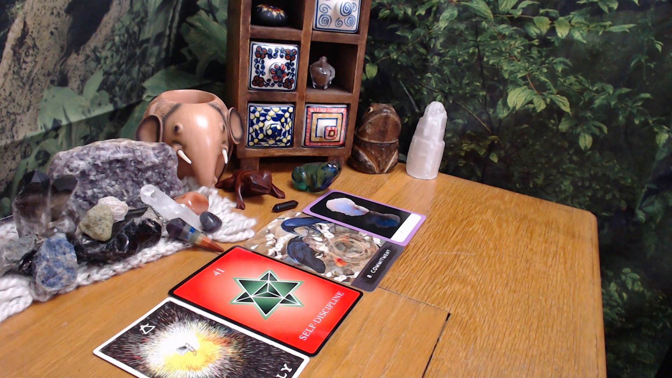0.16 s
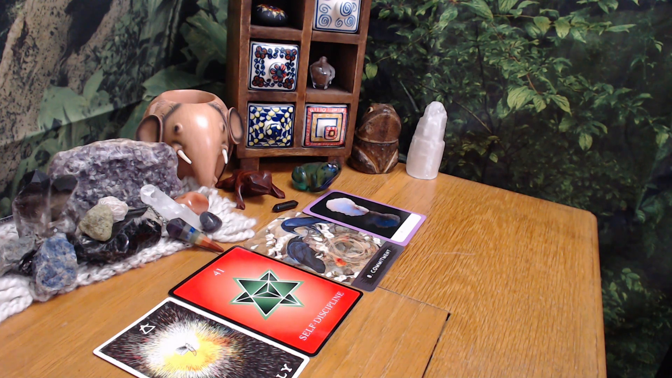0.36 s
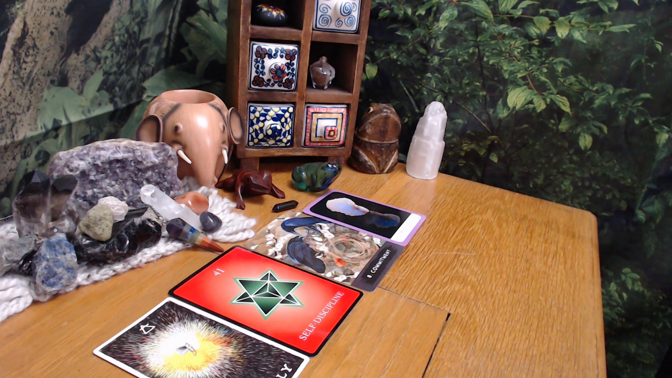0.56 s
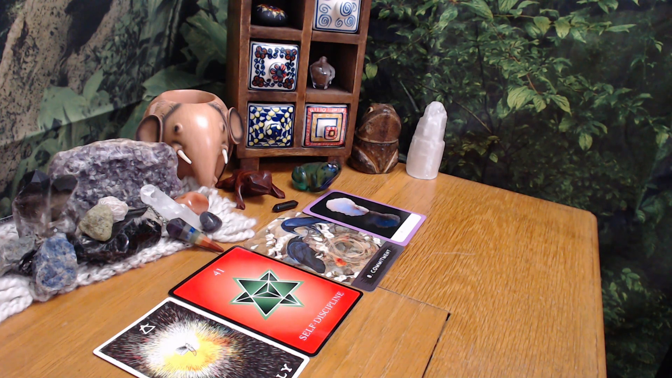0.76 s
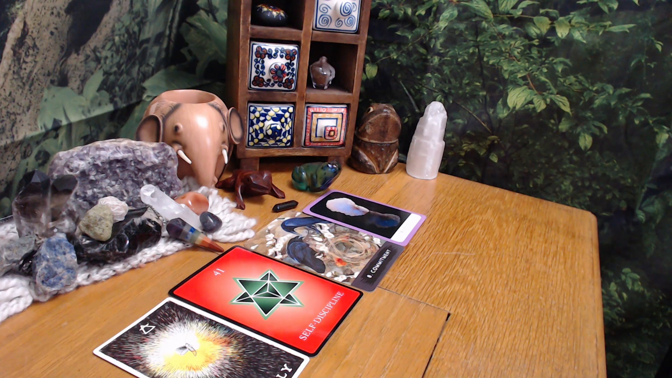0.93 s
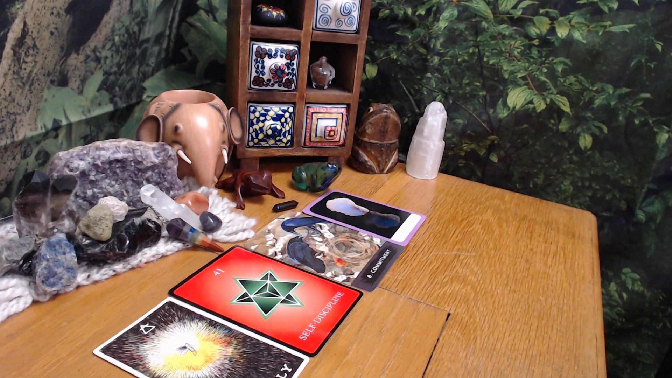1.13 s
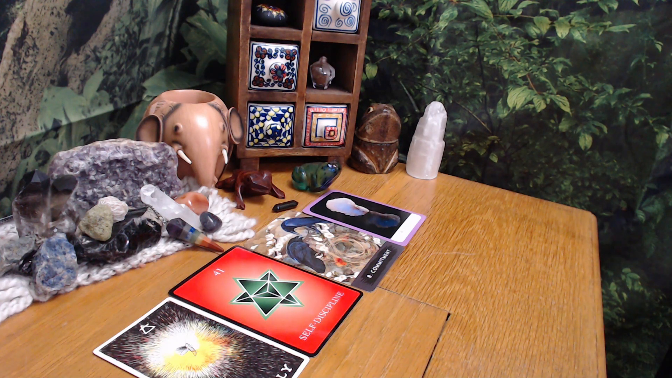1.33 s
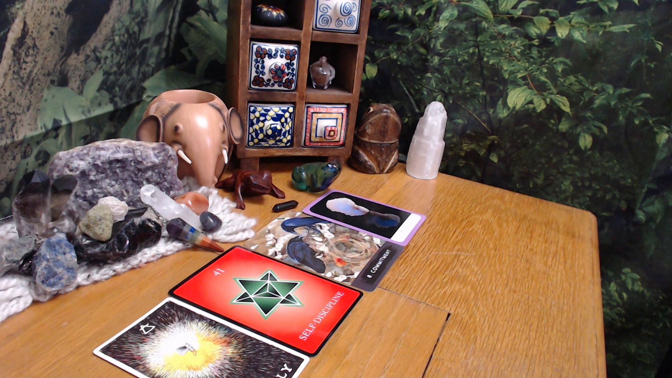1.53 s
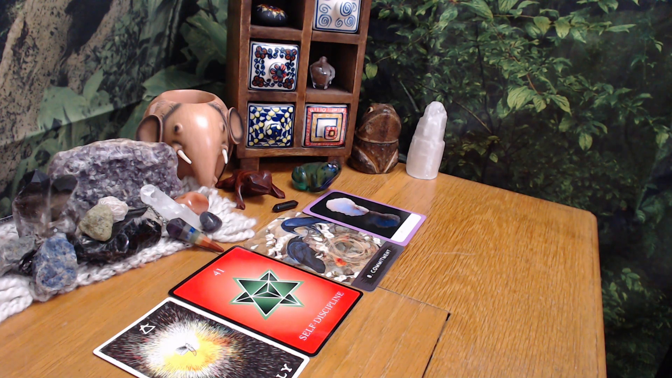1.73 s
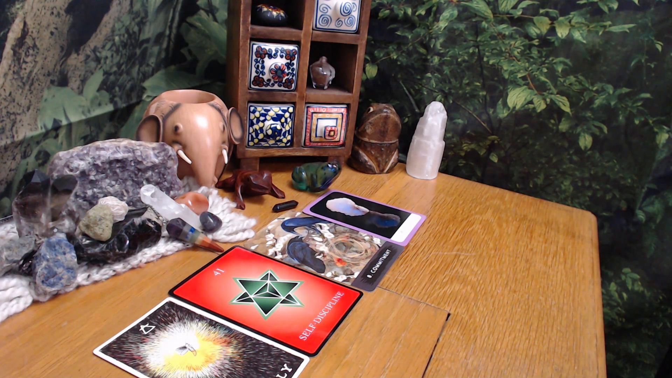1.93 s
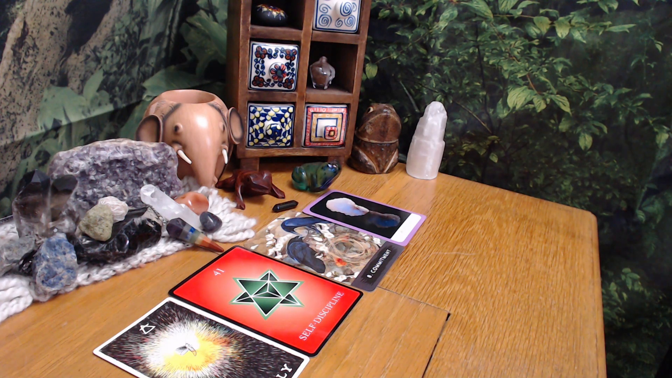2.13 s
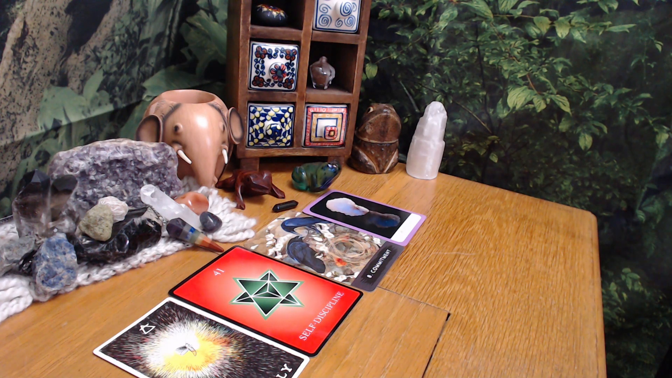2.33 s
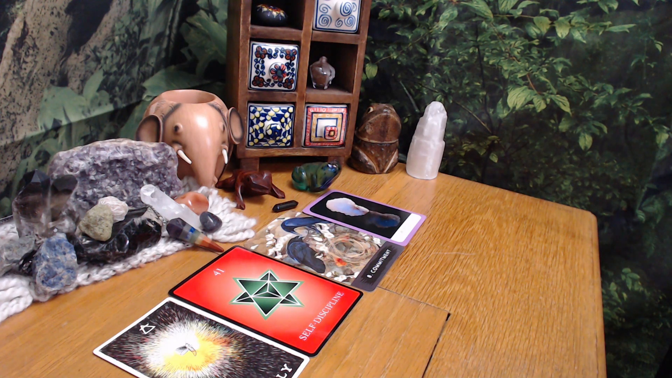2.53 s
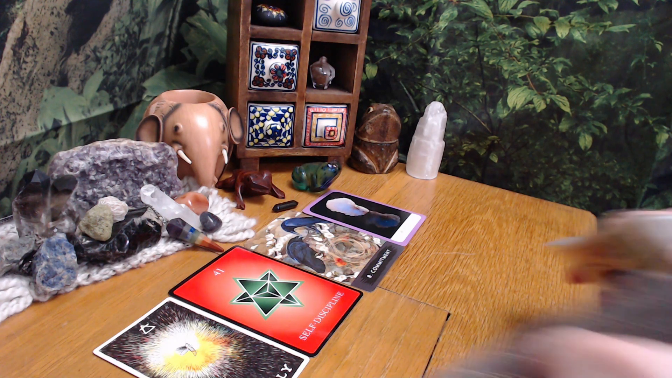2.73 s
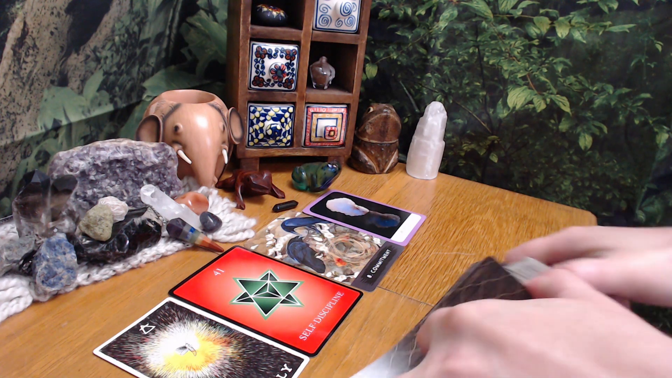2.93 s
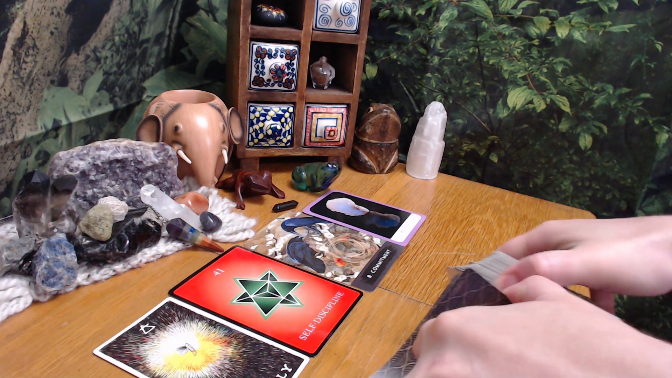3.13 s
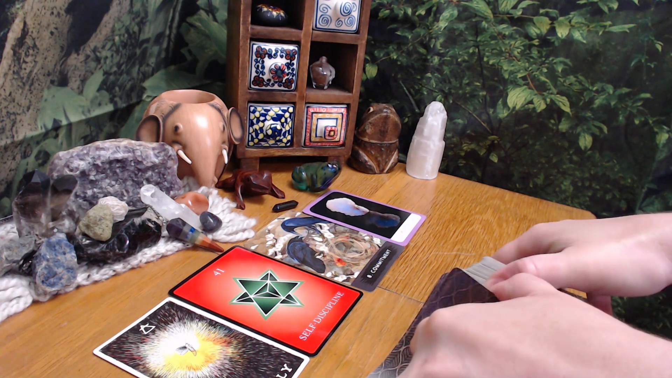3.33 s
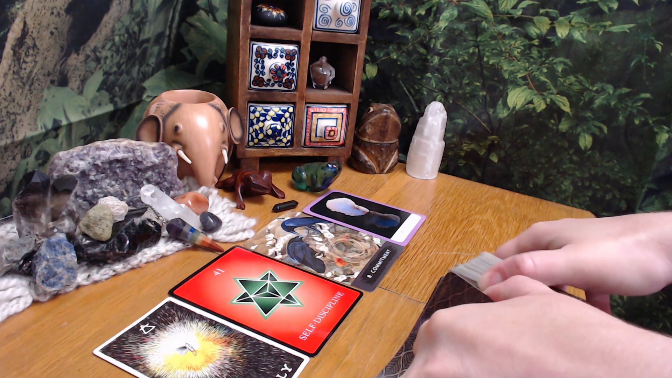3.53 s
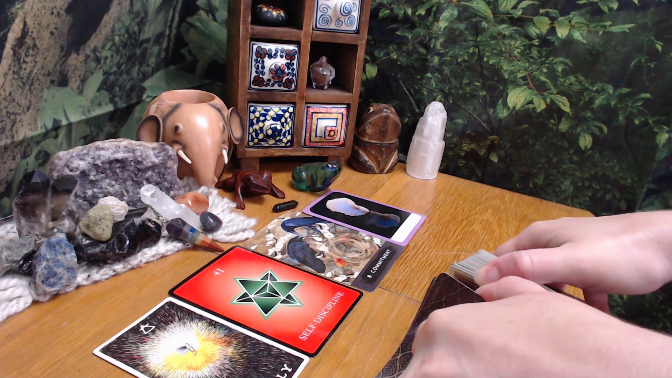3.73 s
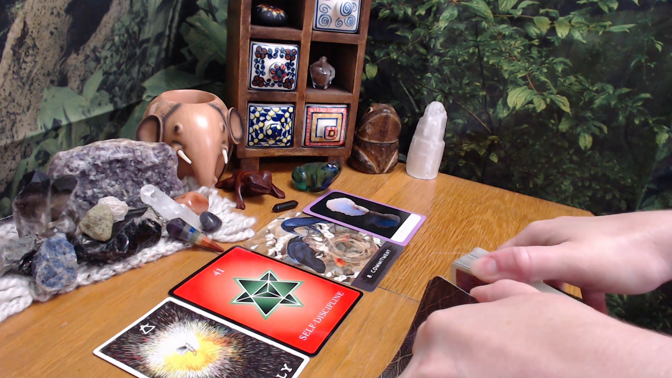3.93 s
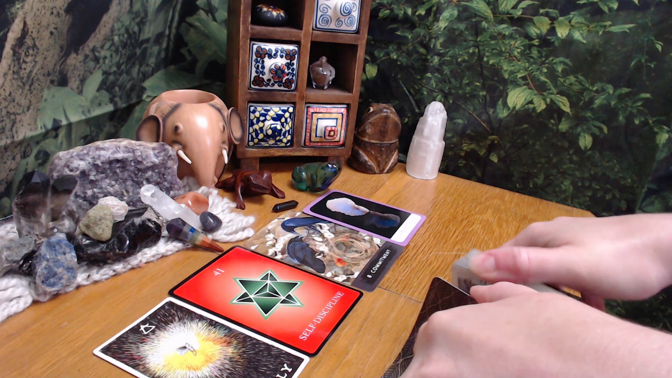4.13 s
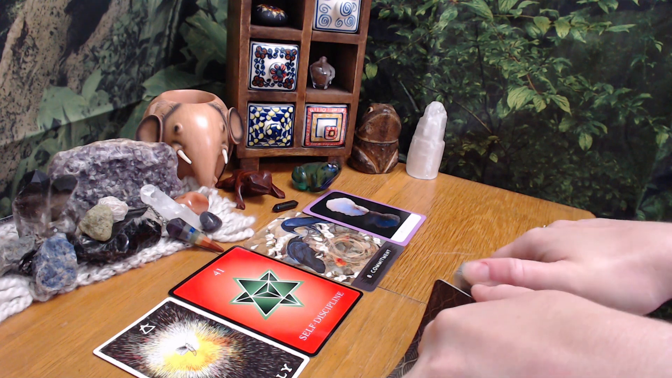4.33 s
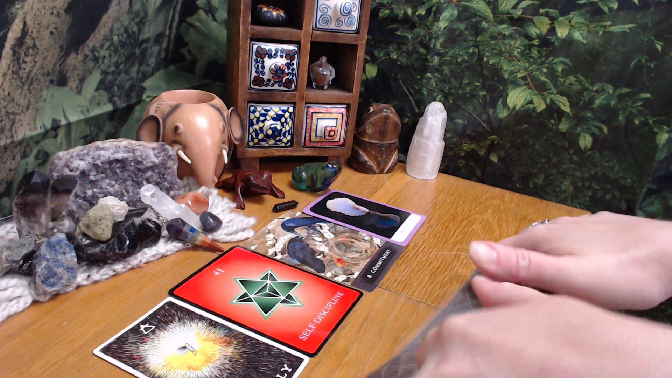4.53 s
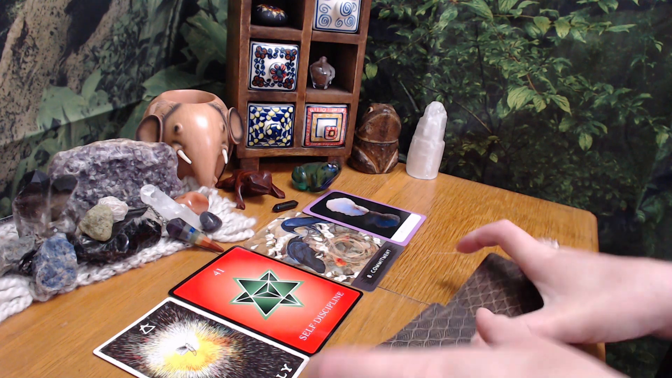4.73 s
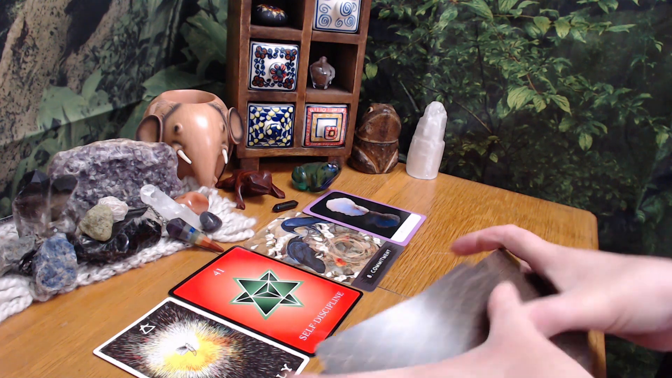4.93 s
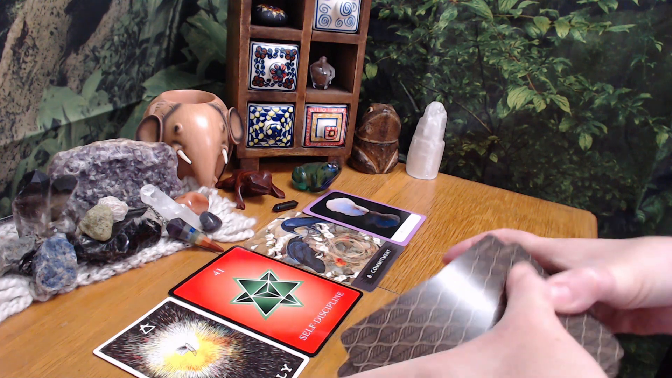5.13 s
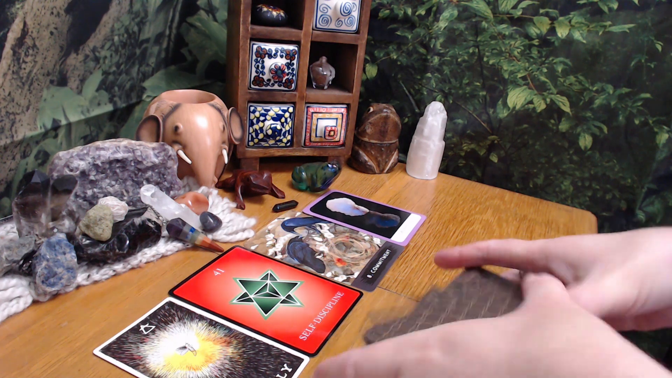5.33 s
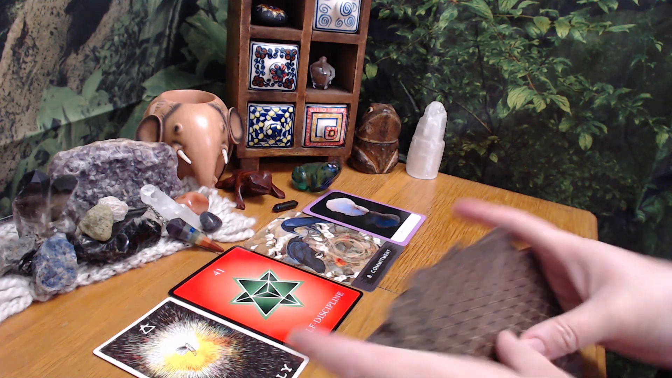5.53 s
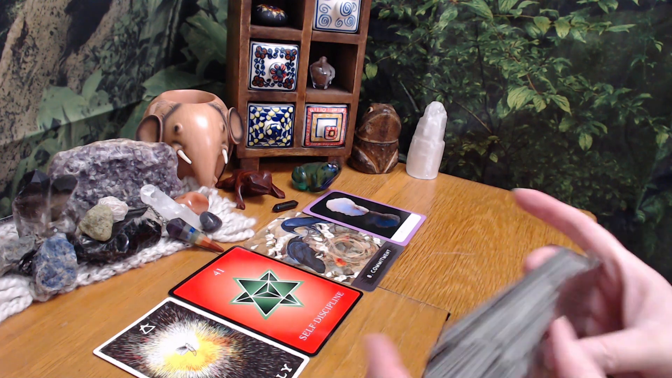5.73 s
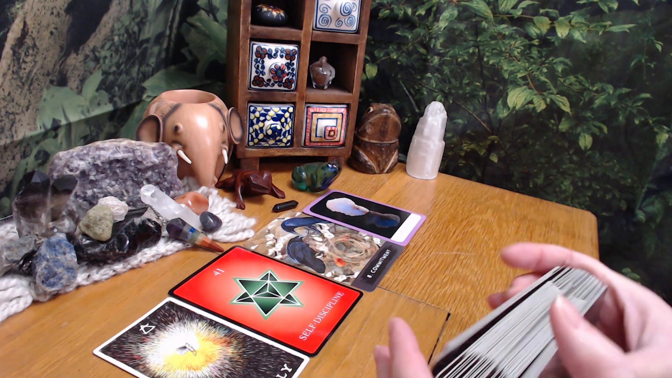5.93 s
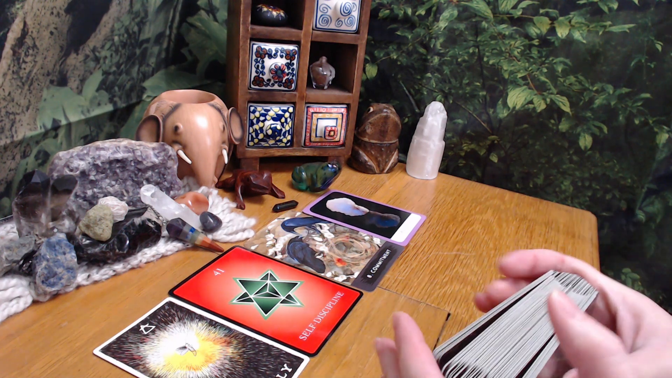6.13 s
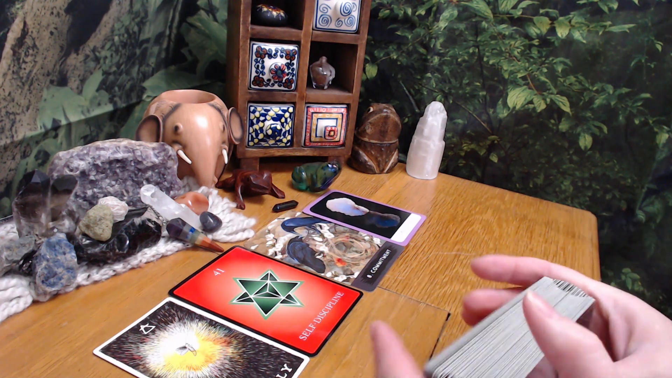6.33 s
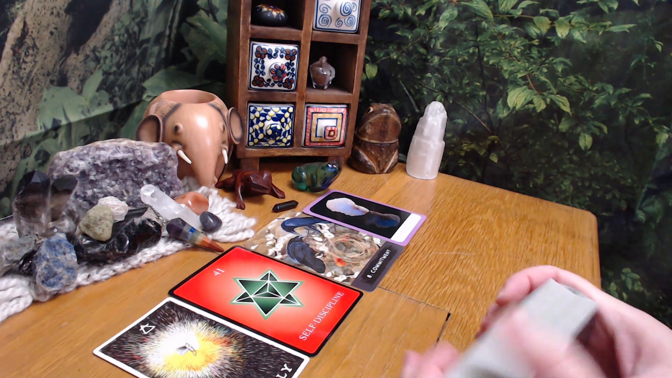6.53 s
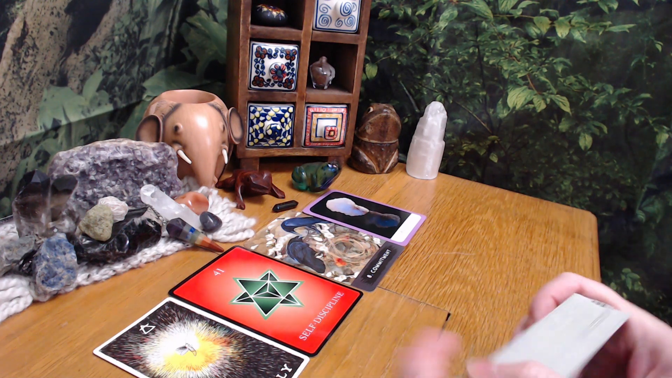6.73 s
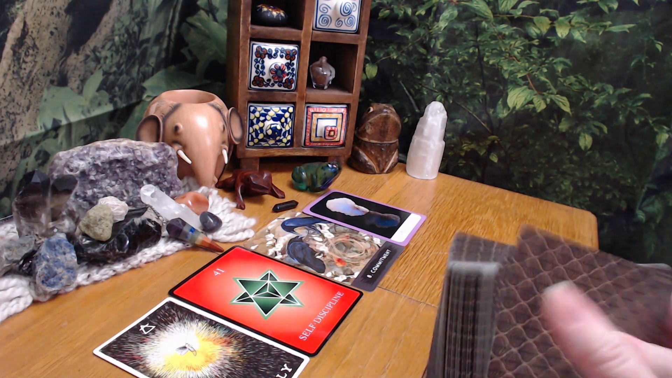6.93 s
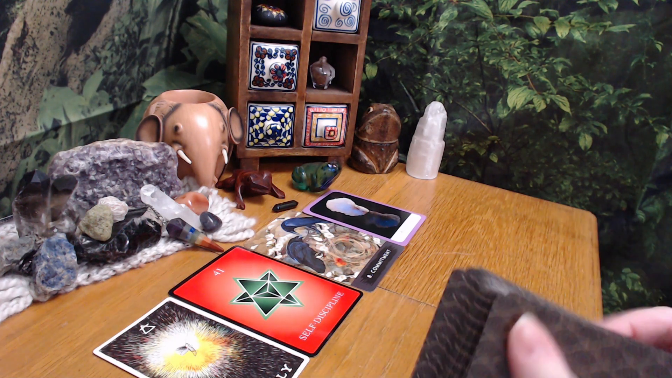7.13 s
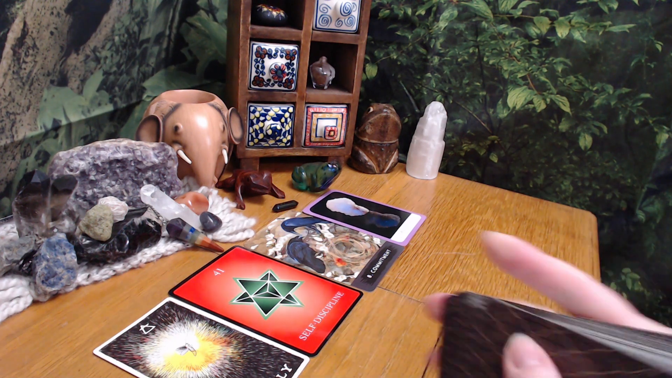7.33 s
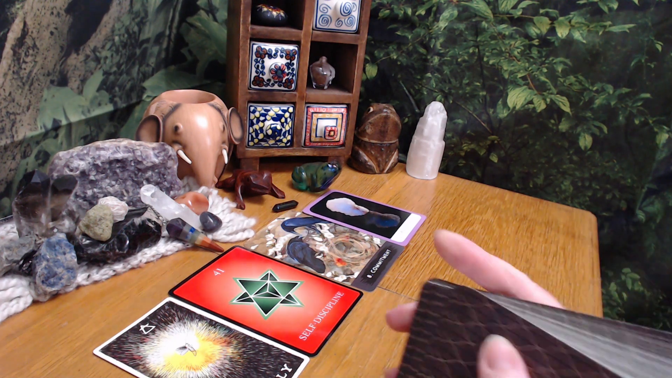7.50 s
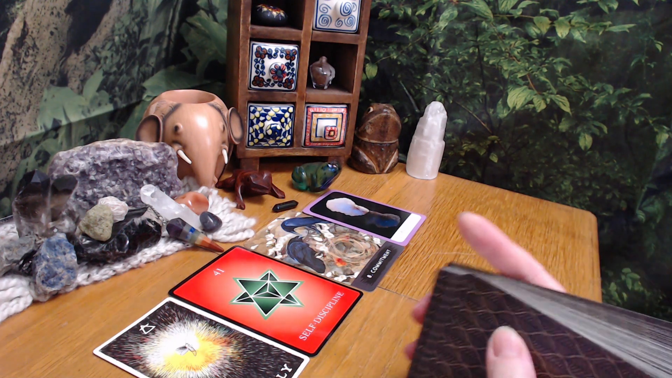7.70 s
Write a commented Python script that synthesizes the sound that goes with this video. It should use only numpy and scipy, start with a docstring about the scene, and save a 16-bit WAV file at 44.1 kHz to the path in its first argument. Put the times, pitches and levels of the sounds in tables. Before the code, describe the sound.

A deck of cards is riffled on a wooden table, then slid together and knocked square, close up.

```python
"""A deck of stiff cards is riffled on a wooden table, close to a small microphone.
Packets of cards slap down one after another, each with a crack, a short ring and a thump in the table.
Then the halves rub and hiss as they slide together, and the deck is knocked square.
A small, quiet room echoes and hums faintly, and the table top wobbles when someone leans on it."""
import sys
import numpy as np
from scipy import signal
from scipy.fft import rfft, irfft, next_fast_len
from scipy.io import wavfile
from scipy.ndimage import map_coordinates

SR = 44100
rng = np.random.default_rng(int(sys.argv[2]) if len(sys.argv) > 2 else 0)


def digitize_waveform(pressure):
    """Quantize a signal to 16-bit integers and store it at the path in sys.argv[1].

    Rows of a 2-D input are taken as channels; values are limited to [-1, 1].
    """
    field = np.atleast_2d(pressure).T
    bounded = np.clip(field, -1, 1)
    quanta = np.round(bounded * 32767).astype(np.int16)
    wavfile.write(sys.argv[1], SR, quanta)


N = 346626
HIT_TIME = np.arange(5400) / SR  # seconds since the start of one hit

# The room's background noise. Each row: frequency in Hz, level in dB.
AIR_COLOUR = [(12, -22), (20, 1), (48, -4.5), (223, -22), (874, -24.5), (1470, -30.5), (1800, -31.5),
              (2610, -42.5), (3790, -40.5), (4080, -38), (4400, -44.5), (7050, -42.5), (7600, -43.5),
              (9880, -76.5), (16700, -120)]
# Faint appliance hums. Each row: pitch in Hz, how far it wanders in Hz, level in dB.
HUMS = [(160, 5, -67.5), (4102, 12, -82)]
# The table top wobbles. Each row: middle in seconds, half length in seconds, level in dB, pitch in Hz.
TABLE_SWAYS = [(.0, 0.1, -39, 14), (0.625, 0.12, -35.5, 28), (0.6, 0.091, -52.5, 86),
               (1.313, 0.081, -30, 28), (1.44, 0.12, -35.5, 15), (2.037, 0.055, -44, 30),
               (2.1, 0.027, -46.5, 62)]
# Soft rubbing never quite stops: clothes rustle at first, then the deck moves in the hands. Each row: time in
# seconds, level of the rubbing in dB.
STEADY_RUB = [(0.3, -75), (1.8, -76.5), (2.0, -79.5), (2.45, -84), (2.66, -72), (3.0, -70.5), (3.6, -52),
              (4.0, -42.5), (4.44, -46.5), (4.48, -58.5), (4.62, -66), (4.95, -59), (5.3, -65), (5.4, -66),
              (5.6, -61), (5.75, -66), (5.95, -65.5), (6.0, -66.5), (6.4, -71.5), (6.7, -67.5), (6.75, -92),
              (6.85, -69), (7.6, -67), (7.86, -81.5)]
# Cards slide on each other.
# Each row: middle in seconds, half length in seconds, rub level in dB, hiss in dB above the rub.
STROKES = [(0.022, 0.037, -64.5, 8), (0.649, 0.021, -61.5, -8), (1.806, 0.0089, -60.5, 5),
           (4.691, 0.032, -55, 2), (4.798, 0.0083, -47, -1.5), (5.115, 0.039, -44, 12),
           (5.172, 0.029, -24, 1), (5.21, 0.013, -24, -9), (5.49, 0.045, -46, -1),
           (5.615, 0.013, -38, -12.5), (5.721, 0.053, -39.5, -29), (5.818, 0.018, -29, -19),
           (5.851, 0.026, -32.5, -27), (5.897, 0.017, -38, -3), (5.959, 0.023, -44, -30),
           (6.069, 0.048, -53, -4.5), (6.235, 0.03, -47.5, -33), (6.345, 0.0082, -39, -3.5),
           (6.355, 0.016, -52, -36), (6.497, 0.029, -54, -24), (6.553, 0.0096, -53, -0.5),
           (6.642, 0.019, -50.5, -6), (6.7, 0.022, -54, -5), (6.958, 0.055, -69, 8),
           (7.06, 0.0115, -50, -3), (7.309, 0.049, -61.5, 5.5), (7.404, 0.0056, -50.5, -16),
           (7.487, 0.11, -75, 6.5), (7.774, 0.028, -68, 0)]
# A tightly bent deck sounds thin, a loose one hollow.
# Each row: time in seconds, level of the hollow sound in dB above the rub.
HOLLOWNESS = [(0, 0.5), (0.6, 6), (2.6, 12), (3.2, -3), (4.4, 4.5), (4.55, 11), (4.8, -4), (5.1, -16),
              (5.2, 2), (5.3, -4), (5.5, -6.5), (5.6, 9), (5.72, 9.5), (5.8, -0.5), (5.9, 2.5), (6.1, 9),
              (6.28, 10.5), (6.34, -0.5), (6.38, 22.5), (6.5, 10), (6.7, 10), (6.9, 11), (7.1, -6.5),
              (7.4, 4), (7.86, 10.5)]
# The tone of faces rubbing, an edge snapping and a card bending back.
# Each row: frequency in Hz, level in dB.
FACE_COLOUR = [(500, -28), (1000, 6.5), (1600, 9.5), (2400, 5), (3500, -1.5), (5000, -36)]
EDGE_COLOUR = [(1800, -9), (3000, -8.5), (4000, -5.5), (4800, -6.5), (6500, -9), (7600, -15.5), (9000, -12)]
BEND_COLOUR = [(290, -32.5), (500, -0.5), (892, 0), (1070, -3), (1640, -2), (1990, -5), (2820, -5),
               (4260, -15.5), (4500, -17), (5850, -30), (9900, -120)]
# How the loose deck, the table, the squared deck and a cupped palm ring.
# Each row: pitch in Hz, width in Hz, level in dB.
LOOSE_DECK_MODES = [(159, 46, -3.5), (254.4, 54, -2.5), (347.2, 31, 0), (534, 51, 1), (724, 62, -3.5),
                    (955, 110, -6), (1461, 110, -13)]
TABLE_MODES = [(70.6, 28, -5), (118.2, 24, -0.5), (174, 14.7, 4), (241, 30.5, 5), (414, 170, 0),
               (580, 220, -0.5)]
SQUARED_DECK_MODES = [(300, 21, -18), (720, 68, 0.5), (983, 43, -3.5), (1458, 99, 5), (1560, 270, -7),
                      (2284, 150, 1.5), (2960, 390, -6)]
PALM_MODES = [(171, 48, -3), (114, 53, -4.5)]
# The room's echo. Each row: frequency in Hz, seconds it takes to fade by 60 dB.
ECHO_FADES = [(100, 0.55), (300, 0.29), (700, 0.2), (2000, 0.15), (6000, 0.16)]
# The cards are farther off at first, then close. Each row: time in seconds, echo level in dB.
ECHO_LEVELS = [(2.0, -6.5), (2.8, -8)]
# Packets of cards slap down. Each row: start in seconds, level in dB, ringing pitch in Hz.
PACKET_SLAPS = [(1.078, -33.5, 1330), (1.5, -36, 804), (1.512, -36, 1340), (1.691, -35.5, 880),
                (3.098, -29, 1350), (3.121, -4, 1130), (3.225, -30.5, 813), (3.234, -19, 965),
                (3.249, -15.5, 697), (3.285, -32, 1300), (3.301, -16, 905), (3.309, -16, 752),
                (3.324, -13, 670), (3.39, -30.5, 1640), (3.406, -17.5, 937), (3.437, -9.5, 595),
                (3.47, -11, 2900), (3.536, -28, 1540), (3.556, -29.5, 1450), (3.565, -33, 1510),
                (3.588, -26.5, 640), (3.607, -5, 1424), (3.644, -8, 820), (3.677, -13.5, 607),
                (3.702, -25, 1500), (3.719, -18, 1730), (3.733, -19, 1520), (3.752, -20.5, 2210),
                (3.765, -3, 637), (3.784, -12, 585), (3.831, -18, 931), (3.844, -2.5, 1522),
                (3.857, -13.5, 1430), (3.867, -9.5, 3176), (3.91, -15, 2470), (3.939, -11.5, 587),
                (3.957, -4, 982), (3.982, -7.5, 2673), (3.99, -11, 1495), (4.005, -17.5, 653),
                (4.039, -13, 1320), (4.049, -7, 715), (4.069, -8, 1240), (4.085, -7, 758), (4.095, -8, 930),
                (4.145, -3, 1005), (4.151, 0, 1700), (4.168, -13, 1685), (4.189, -5.5, 2736),
                (4.203, -14, 1514), (4.227, -9.5, 1472), (4.26, -21, 1480), (4.265, -9, 1477),
                (4.287, -5, 876), (4.306, -4, 1213), (4.319, -7, 842), (4.338, 4, 777), (4.346, -5, 794),
                (4.353, -2.5, 3400), (4.361, -8, 2910), (4.37, -7.5, 2966), (4.395, -4, 582),
                (4.427, -0.5, 626), (4.448, -10.5, 1454), (4.863, -23, 2995), (4.896, -33, 1980),
                (5.212, -5.5, 720), (5.254, -17, 1820), (6.983, -36.5, 840), (7.18, -37.5, 620)]
# Bare card edges flick past each other. Each row: start in seconds, level in dB.
EDGE_TICKS = [(1.082, -44), (1.515, -44.5), (1.692, -41), (2.964, -26), (5.17, -14), (5.809, -24.5),
              (5.815, -17), (3.21, -31), (4.416, -13.5), (4.458, -10), (5.295, -37), (5.319, -43),
              (5.387, -43.5), (6.687, -50), (6.737, -41), (7.142, -43.5), (7.339, -36), (7.458, -44),
              (7.738, -51)]
# Hands press the deck on the table. Each row: start in seconds, level in dB.
HAND_PUSHES = [(2.812, -33.5), (2.988, -33)]
# Duller blows: cards slap together in the hands, or the deck is set down or knocked square.
# Each row: start in seconds, level in dB, ringing pitch in Hz.
DULL_BLOWS = [(2.813, -42, 570), (2.964, -15.5, 681), (5.14, -8.5, 820), (5.169, -3.5, 925),
              (5.195, -8, 655), (5.574, -31.5, 1800), (5.602, -22, 1490), (5.609, -16.5, 1130),
              (5.677, -0.5, 1468), (5.685, -9, 2363), (5.69, -15.5, 1410), (5.764, -29.5, 1476),
              (5.797, -15.5, 990), (5.816, -10, 1448), (5.884, -8, 779), (5.95, -23, 1140),
              (6.483, -37, 930)]
# A card corner drags.
# Each row: middle in seconds, half length in seconds, level in dB, pitch in Hz, climb in Hz per second.
CORNER_SCRAPES = [(4.799, 0.0069, -44.5, 1680, 0), (4.904, 0.0078, -43.5, 2050, 0),
                  (5.09, 0.029, -44, 1807, 3), (5.496, 0.029, -39, 2454, 9000.5)]
# A palm cups the deck. Each row: middle in seconds, level in dB.
PALM_PATS = [(6.281, -44), (6.374, -43), (6.525, -41.5), (6.555, -49), (7.361, -53), (7.8, -49)]
# The tones in a finger's squeak. Each row: pitch in Hz, level in dB.
SQUEAK_TONES = [(870, 3), (1680, -2), (2400, -2), (4100, -11.5)]


def amp(db):
    """Turns decibels into a number to multiply by."""
    return 10 ** (np.asarray(db) / 20)


def unit(x):
    """Scales a sound to an average strength (rms) of 1."""
    return x / np.sqrt(np.mean(x ** 2) + 1e-20)


def along(points, hz):
    """Reads between (Hz, value) points on a logarithmic frequency scale."""
    freqs, values = np.transpose(points)
    return np.interp(np.log(hz + 1), np.log(freqs + 1), values)


def curve(points):
    """Joins (seconds, value) points with straight lines."""
    return np.interp(np.arange(N) / SR, *np.transpose(points))


def wobble(rate):
    """A smooth curve through `rate` random values a second."""
    return map_coordinates(rng.standard_normal(int(N * rate / SR) + 4), [np.arange(N) * rate / SR])


def swell(middle, half, squareness):
    """A rise and fall around one moment."""
    out = np.zeros(N)
    near = np.arange(max(round((middle - 5 * half) * SR), 0), min(round((middle + 5 * half) * SR), N))
    out[near] = np.exp(-(np.abs(near / SR - middle) / half) ** squareness)
    return out


def filtered(x, response):
    """Changes a sound's tone with a filter, scaled so that white noise keeps its power."""
    size = next_fast_len(N + SR // 2, True)
    gain = response(np.fft.rfftfreq(size, 1 / SR))
    return irfft(rfft(x, size) * gain / np.sqrt(np.mean(np.abs(gain) ** 2)), size)[:N]


def colour(points):
    """A filter that follows (Hz, dB) points."""
    def response(hz):
        cepstrum = irfft(np.log(amp(along(points, hz)) + 1e-4))
        # fold it so that no sound comes out before it goes in
        cepstrum[1:len(cepstrum) // 2] *= 2
        cepstrum[len(cepstrum) // 2 + 1:] = 0
        return np.exp(rfft(cepstrum))
    return response


def modes(table):
    """A filter that rings at an object's own pitches."""
    return lambda hz: sum((-1) ** k * amp(db) * 1j * hz * width / (pitch**2 - hz**2 + 1j * hz * width)
                          for k, (pitch, width, db) in enumerate(table))


def fade(seconds):
    """A hit dying away by 60 dB in this time."""
    return amp(-60 * HIT_TIME / seconds)


def crack(tail, tail_s=0.056):
    """The outline of a card hit: a fast rise, a sharp drop and a longer tail."""
    return (fade(0.011) + tail * fade(tail_s)) * (1 - np.exp(-HIT_TIME / 0.00076))


def hit_noise():
    """Fresh noise, one hit long."""
    return rng.standard_normal(len(HIT_TIME))


def place(hits):
    """Lays (start in seconds, sound) pairs on one track."""
    track = np.zeros(N + SR)
    for start, sound in hits:
        track[round(start * SR):][:len(sound)] += sound
    return track[:N]


def room_air(level_db=-53):
    """The room's slightly restless background noise, with wavering appliance hums."""
    air = amp(level_db + wobble(0.69)) * unit(filtered(rng.standard_normal(N), colour(AIR_COLOUR)))
    for hz, wander_hz, db in HUMS:
        level = amp(db + 3.2 * wobble(4.3))
        pitch = hz + wander_hz * wobble(4.5)
        air += level * unit(np.sin(2 * np.pi * np.cumsum(pitch) / SR))
    return air


def table_sway():
    """Leaned on, the table top rocks at a very low, unsteady pitch."""
    t = np.arange(N) / SR
    drift = np.cumsum(3 * wobble(30.1)) / SR
    rocking = sum(amp(db) * swell(middle, half, 3.3) * np.sin(2 * np.pi * (hz * t + drift))
                  for middle, half, db, hz in TABLE_SWAYS)
    return amp(2.2 * wobble(25.2)) * rocking


def friction(response, per_second, spread_db, uneven_db):
    """Paper sticks and slips: tiny catches of uneven size on top of a smooth rub."""
    caught = rng.random(N) < per_second / SR
    sizes = amp(spread_db * np.minimum(rng.exponential(size=N), 2.5))
    grit = (unit(caught * sizes) + 2.0) * rng.standard_normal(N) * amp(uneven_db * wobble(90))
    return unit(filtered(grit, response))


def card_slides():
    """Sliding cards rub, hiss and make the hollow of the loose deck sound."""
    rub = amp(curve(STEADY_RUB) + 4.7 * wobble(7.4))
    hiss = amp(-5.5) * rub
    for middle, half, db, hiss_db in STROKES:
        stroke = amp(db) * swell(middle, half, 1.62)
        rub += stroke
        hiss += amp(hiss_db) * stroke
    faces = friction(colour(FACE_COLOUR), per_second=2500, spread_db=2.5, uneven_db=2.5)
    edges = friction(colour(EDGE_COLOUR), per_second=3300, spread_db=0.87, uneven_db=1.5)
    hollow = friction(modes(LOOSE_DECK_MODES), per_second=400, spread_db=1.0, uneven_db=1.0)
    return rub * faces + hiss * edges + rub * amp(curve(HOLLOWNESS)) * hollow


def room_echo(x, chunk=8192, delay_samples=150):
    """Lows linger longest. Each chunk gets a fresh random echo, so the room rings at no fixed pitch."""
    echoes = np.zeros(N + SR)
    for at in range(0, N, chunk):
        hz, t, spectrum = signal.stft(rng.standard_normal(SR // 3), SR, nperseg=256)
        fading = amp(-60 * t / along(ECHO_FADES, hz)[:, None])
        tail = signal.istft(spectrum * fading, SR, nperseg=256)[1]
        echo = signal.fftconvolve(x[at:at + chunk], tail / np.linalg.norm(tail))
        echoes[at + delay_samples:][:len(echo)] += echo
    return echoes[:N]


def card_slaps(rows, thump_db, snap_db, scatter_db=3.5, lifted_s=4.5):
    """Slapping cards bend back, snap at the edges, thump the table and ring briefly."""
    bends, snaps, thumps, rings = [], [], [], []
    for start, db, hz in rows:
        # single cards follow the first crack, some harder than others
        flutter = np.repeat(amp(3.5 * rng.standard_normal(len(HIT_TIME) // 60)), 60)
        shape = crack(0.5 * flutter)
        shape *= np.linalg.norm(crack(0.5)) / np.linalg.norm(shape)
        bends.append((start, amp(db - 8) * shape * hit_noise()))
        snap = amp(db + snap_db + scatter_db * rng.normal())
        snaps.append((start, snap * shape * fade(0.15) * hit_noise()))
        lifted_db = -8 if start > lifted_s else 0  # a lifted deck pushes the table less
        thump = amp(db + thump_db + lifted_db + scatter_db * rng.normal())
        thumps.append((start, thump * fade(0.025) * (0.67 + hit_noise())))
        drift = np.cumsum(0.18 * hit_noise())  # paper never holds a clean note
        rings.append((start, amp(db - 6.5) * fade(0.025) * np.sin(2 * np.pi * hz * HIT_TIME + drift)))
    return (filtered(place(bends), colour(BEND_COLOUR)) + filtered(place(snaps), colour(EDGE_COLOUR))
            + filtered(place(thumps), modes(TABLE_MODES)) + place(rings))


def edge_ticks():
    """Card edges flick past each other with a thin, bright click."""
    flicks = place((start, amp(db) * crack(0.5) * hit_noise()) for start, db in EDGE_TICKS)
    return filtered(flicks, colour(EDGE_COLOUR))


def hand_pushes():
    """Pressing the deck down makes the table thud."""
    pushes = place((start, amp(db) * fade(0.025) * (0.46 + hit_noise())) for start, db in HAND_PUSHES)
    return filtered(pushes, modes(TABLE_MODES))


def dull_blows():
    """Slaps and knocks with almost no edge snap; the stacked cards ring like one block."""
    blows = place((start, amp(db - 8) * crack(0.4, tail_s=0.042) * hit_noise())
                  for start, db, _ in DULL_BLOWS)
    block = filtered(blows, modes(SQUARED_DECK_MODES))
    return block + card_slaps(DULL_BLOWS, thump_db=-17, snap_db=-35)


def corner_scrapes(width_hz=650):
    """A corner drags over the next card and sings in a narrow, papery band that may climb."""
    noise_a, noise_b = wobble(2 * width_hz), wobble(2 * width_hz)
    scrapes = np.zeros(N)
    for middle, half, db, hz, climb in CORNER_SCRAPES:
        t = np.arange(N) / SR - middle
        phase = 2 * np.pi * (hz + 0.5 * climb * t) * t
        band = noise_a * np.sin(phase) + noise_b * np.cos(phase)
        scrapes += amp(db) * swell(middle, half, 2.5) * band
    return scrapes


def palm_pats():
    """Soft, low puffs into the hollow of the hand."""
    puffs = sum(amp(db) * swell(middle, 0.026, 1.9) for middle, db in PALM_PATS)
    return puffs * unit(filtered(rng.standard_normal(N), modes(PALM_MODES)))


def finger_squeak(middle_s=7.063, half_s=0.0079, level_db=-44):
    """A finger slips once on a glossy card and sings four wavering tones."""
    t = np.arange(N) / SR - middle_s
    drift = np.cumsum(0.028 * rng.standard_normal(N))
    tones = sum(amp(db) * np.sin(2 * np.pi * hz * t + k * drift)
                for k, (hz, db) in enumerate(SQUEAK_TONES, 1))
    return amp(level_db) * swell(middle_s, half_s, 2) * tones


def scene():
    """The cards up close, with their echo, the swaying table and the room's air."""
    hits = hand_pushes() + edge_ticks() + dull_blows()
    hits += card_slaps(PACKET_SLAPS, thump_db=-15, snap_db=-9.5)
    cards = hits + card_slides() + finger_squeak() + corner_scrapes() + palm_pats()
    echo = room_echo(amp(curve(ECHO_LEVELS)) * cards)
    return (cards + echo + table_sway() + room_air())[None]


def record(dry, rolloff_hz=7800, top_hz=8150, spray_top_hz=15800):
    """The microphone squeezes loud slaps and cuts the highs; the loudest clip and spray highs back in."""
    size = next_fast_len(N + SR // 2, True)
    hz = np.fft.rfftfreq(size, 1 / SR)
    squeezed = dry / (1 + np.abs(dry / 0.75) ** 4) ** (1 / 4)
    treble_cut = (hz < top_hz) / (1 + (hz / rolloff_hz) ** 60)
    dulled = irfft(rfft(squeezed, size) * treble_cut, size)
    clipped = np.clip(dulled, -0.72, 0.72)
    return irfft(rfft(clipped, size) * (hz < spray_top_hz), size)[:, :N]


dry = scene()
out = record(dry)
digitize_waveform(out)
```